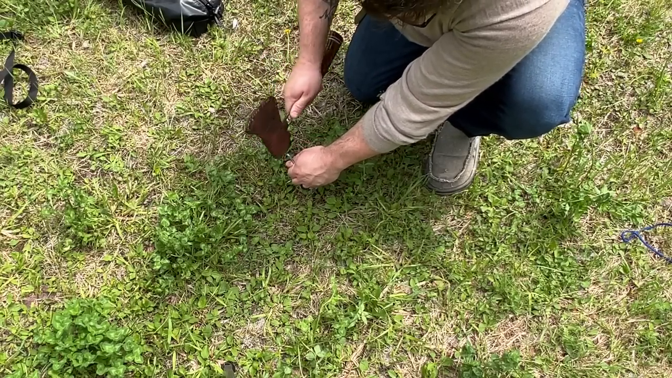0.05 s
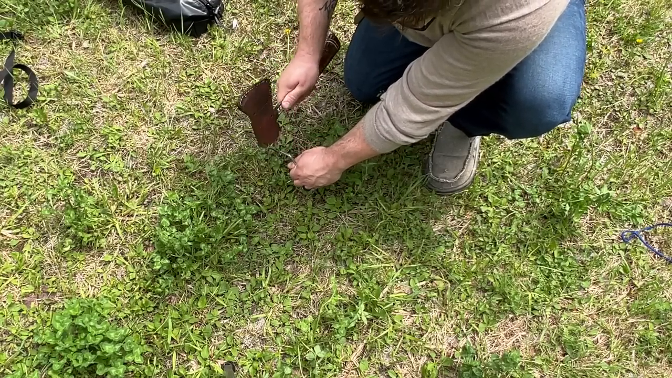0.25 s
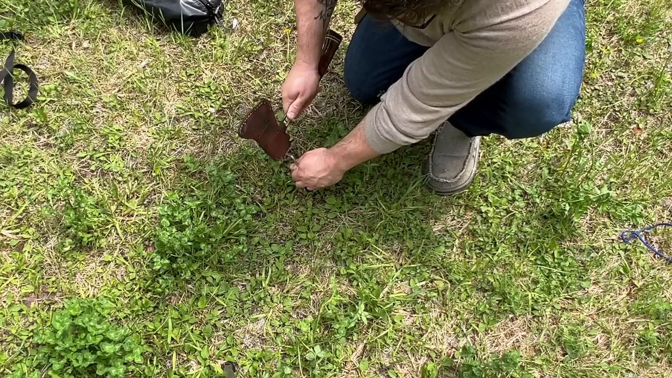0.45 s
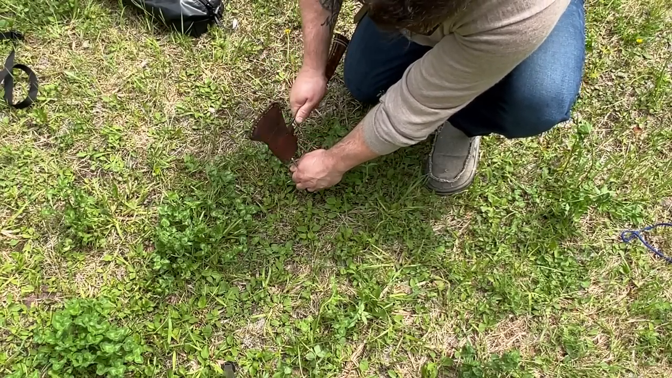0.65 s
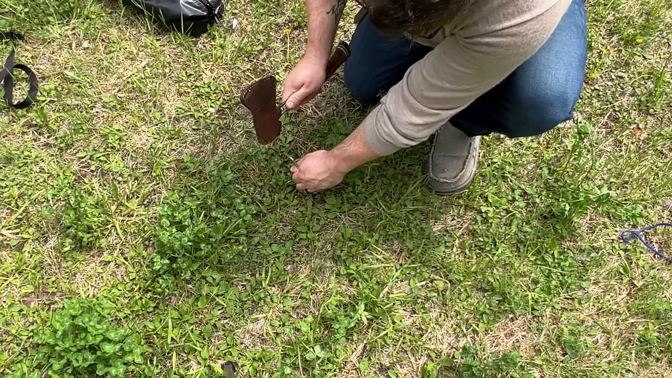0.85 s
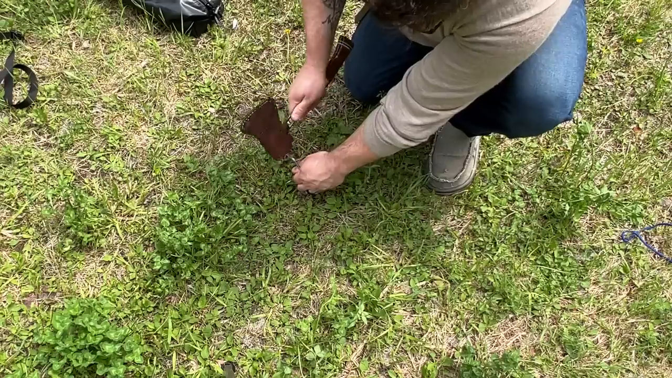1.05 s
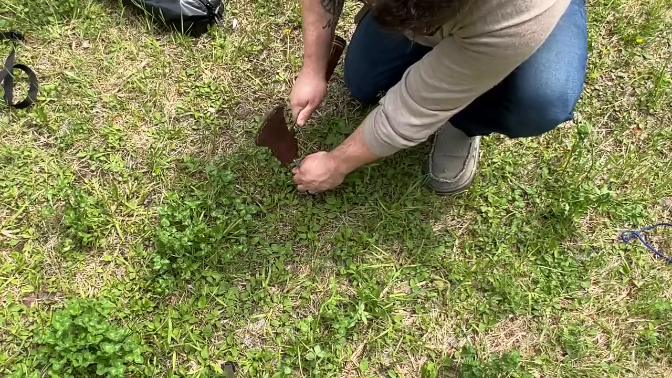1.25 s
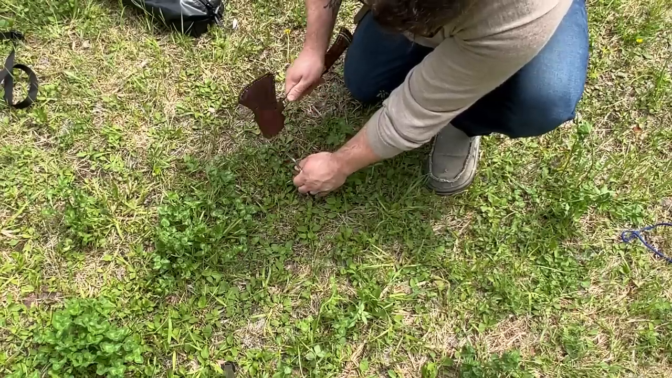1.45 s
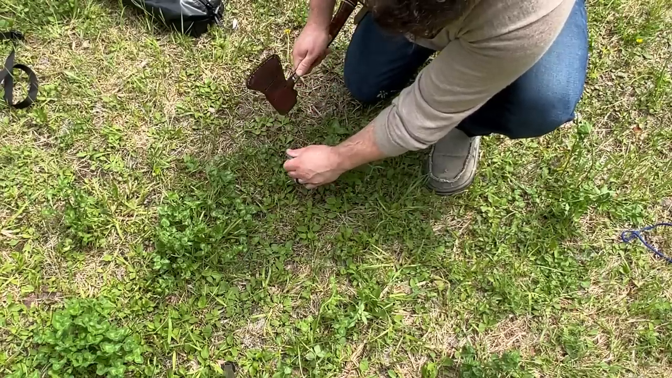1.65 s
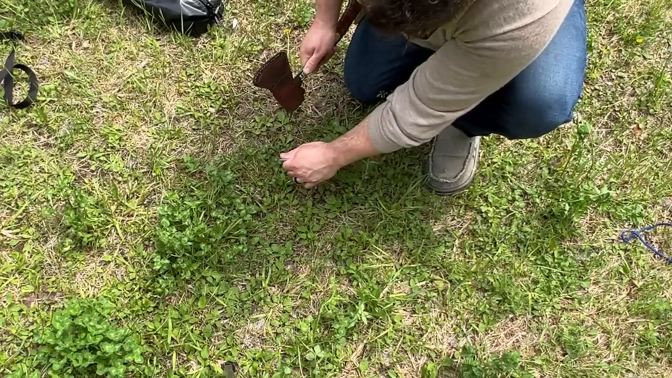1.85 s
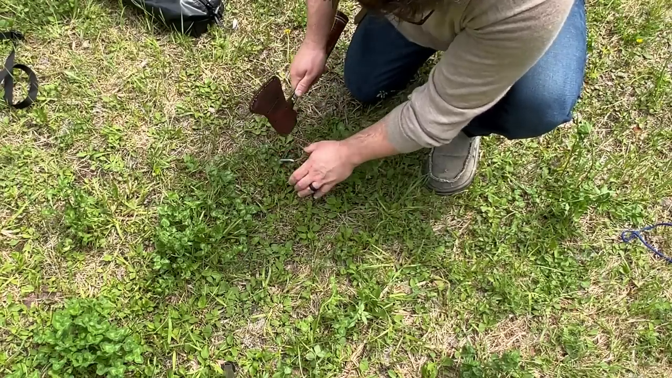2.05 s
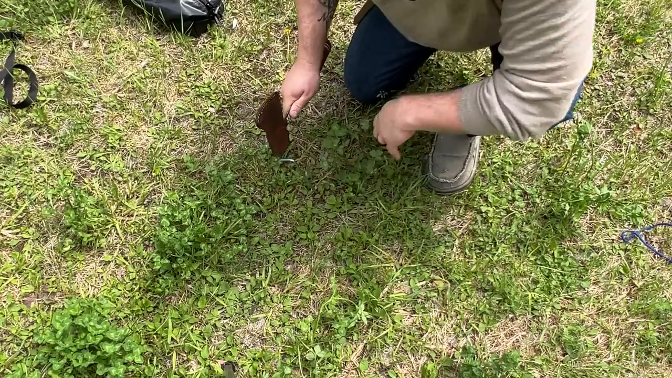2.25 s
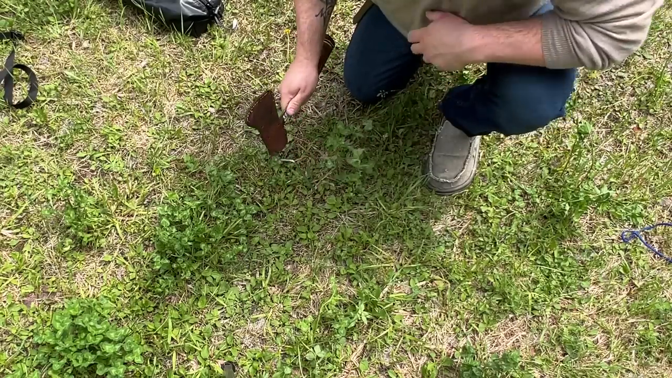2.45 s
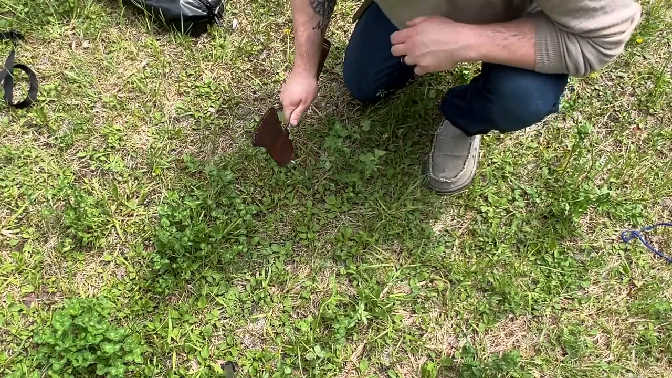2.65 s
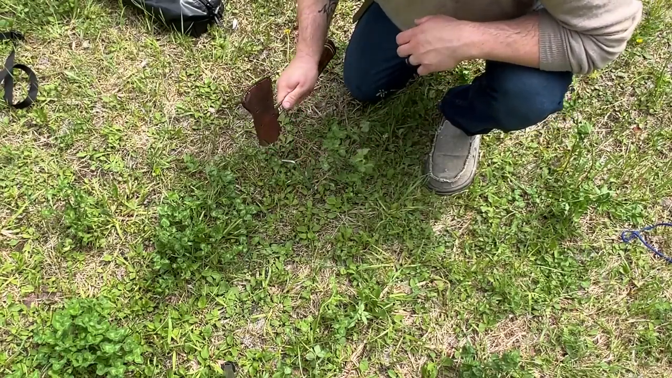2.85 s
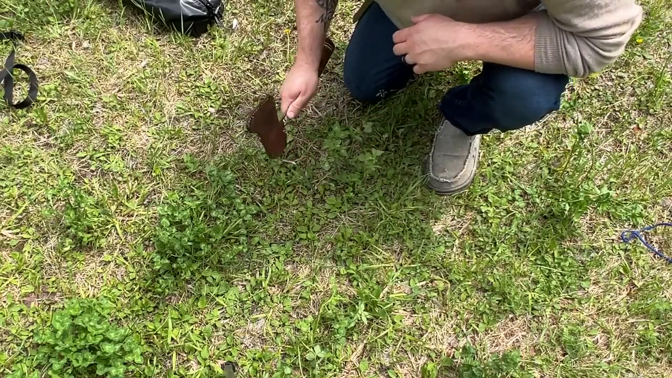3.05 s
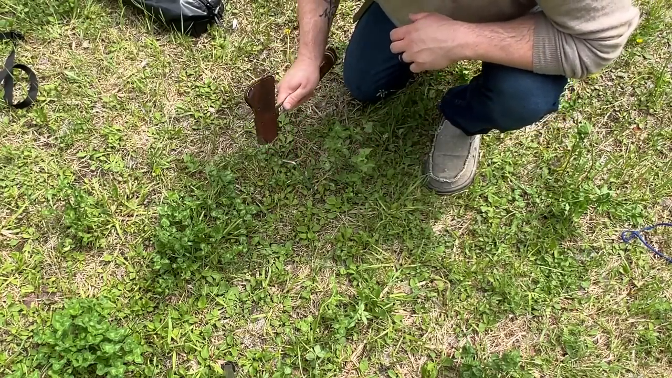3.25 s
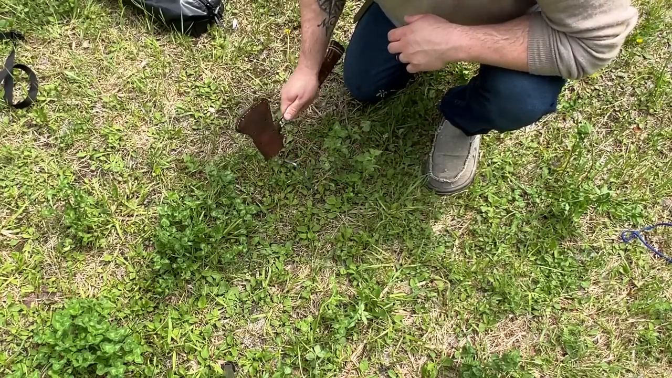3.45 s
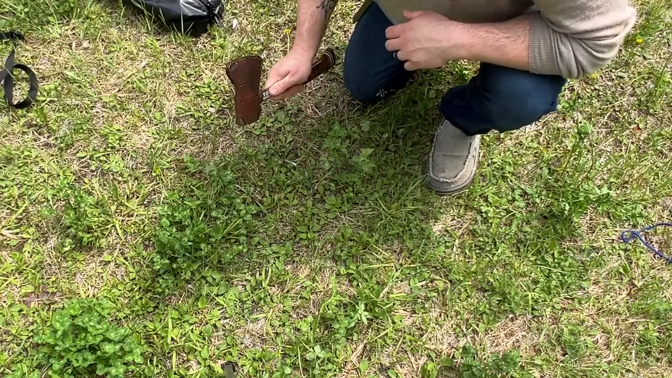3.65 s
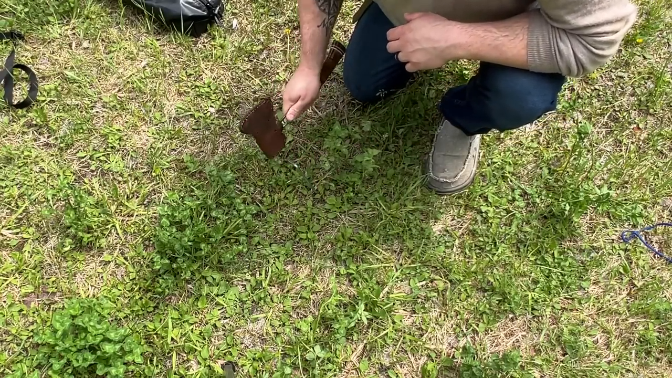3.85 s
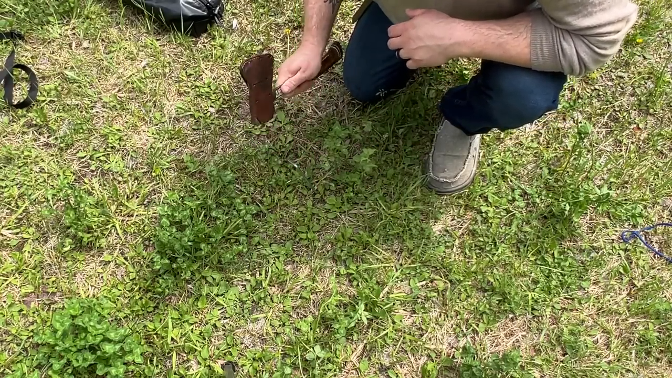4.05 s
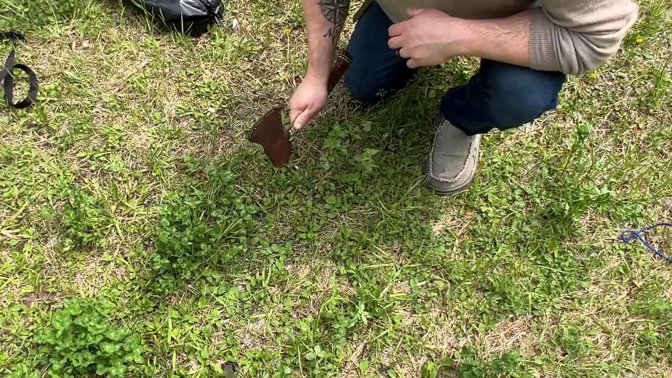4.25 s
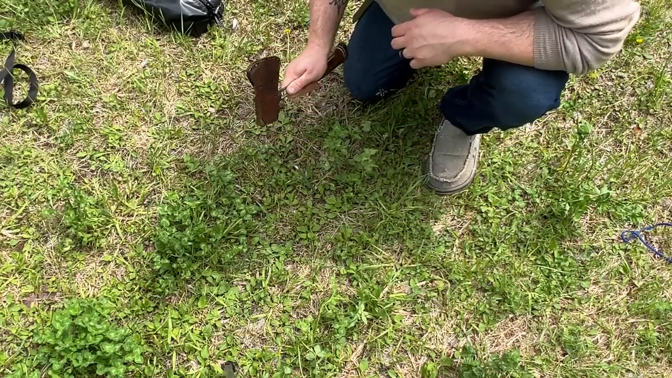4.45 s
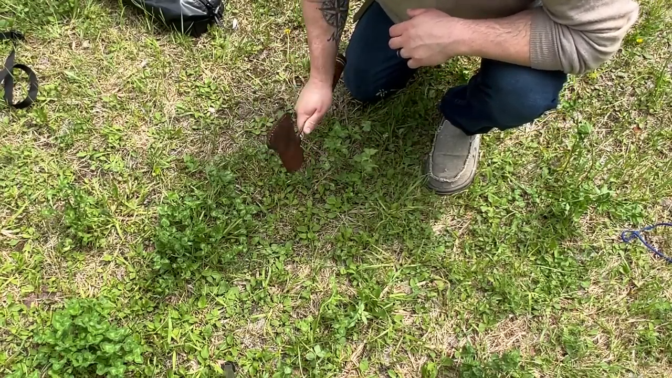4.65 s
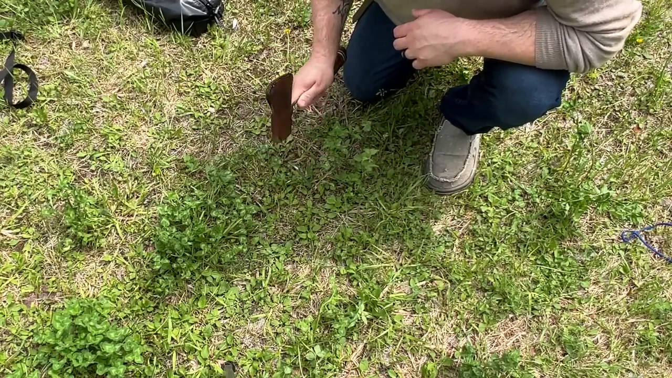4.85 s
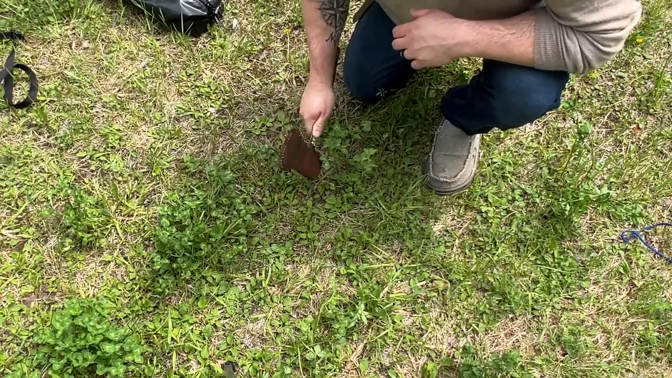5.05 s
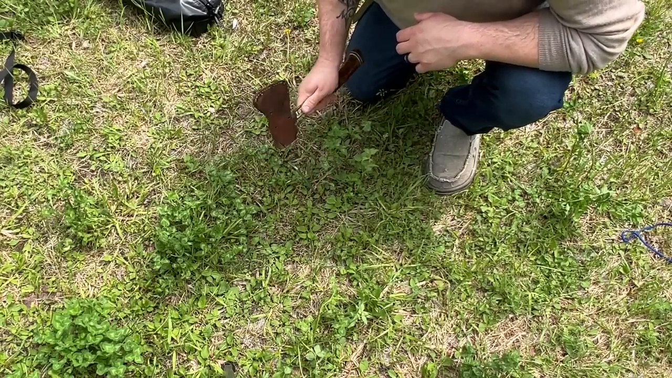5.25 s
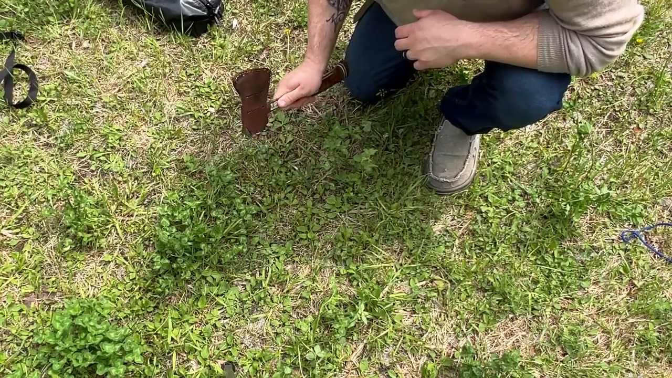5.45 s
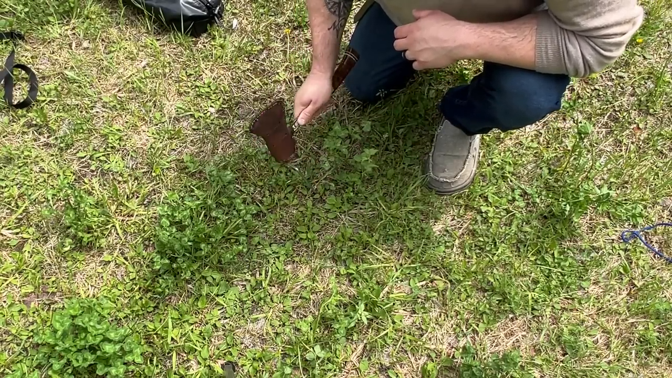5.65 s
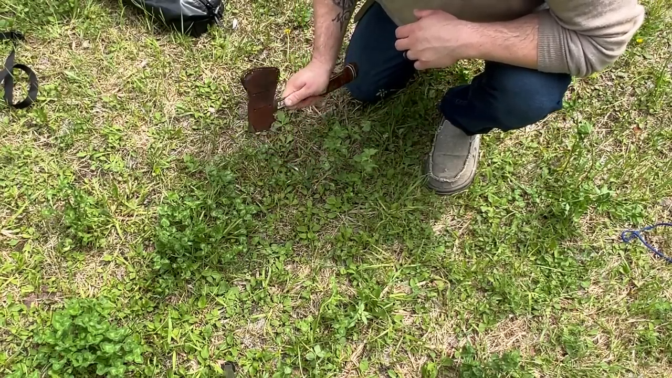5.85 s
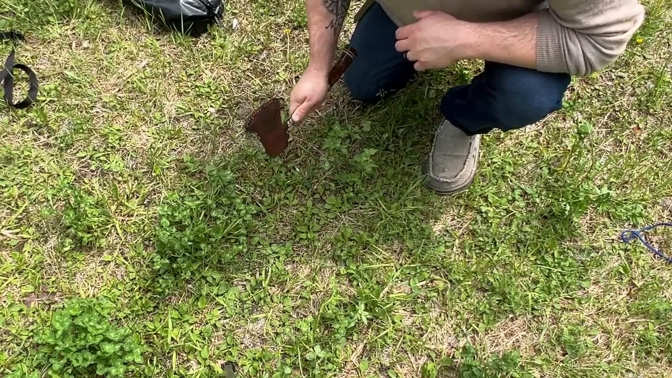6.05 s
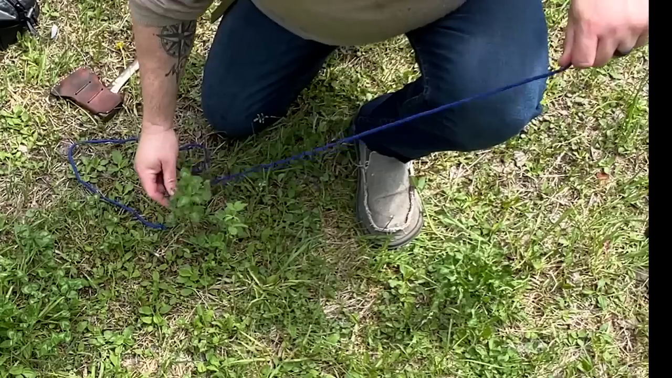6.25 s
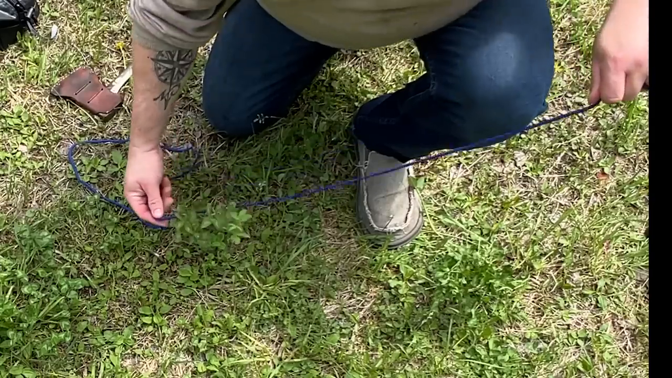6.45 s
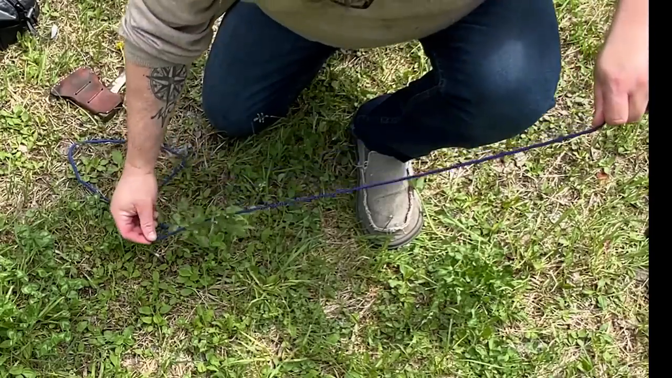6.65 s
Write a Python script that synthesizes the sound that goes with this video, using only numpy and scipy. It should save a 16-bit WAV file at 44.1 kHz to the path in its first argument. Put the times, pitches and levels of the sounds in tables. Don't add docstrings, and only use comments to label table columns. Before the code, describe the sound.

Outdoors, sharp, heavily damped metallic blows with dull earthy thuds, close up, as wind rumbles and a far bird whistles early; quiet breeze ends it.

```python
import sys
import numpy as np
from scipy import signal
from scipy.fft import rfft, irfft, next_fast_len
from scipy.io import wavfile
from scipy.ndimage import uniform_filter1d

SR = 44100
rng = np.random.default_rng(int(sys.argv[2]) if len(sys.argv) > 2 else 0)


def makeup_ratio(level_db):
    decades = np.asarray(level_db, float) / 20
    return 10 ** decades


def dump(signal):
    limited = np.clip(np.atleast_2d(signal).T, -1, 1)
    pcm = np.round(limited * 32767).astype(np.int16)
    wavfile.write(sys.argv[1], SR, pcm)


N = 295470
SPAN = 4096
CUT_S = 6.245


def unit(x):
    return x / np.sqrt(np.mean(x ** 2) + 1e-20)


def at_hz(points, hz):
    points_hz, values = np.transpose(points)
    return np.interp(np.log(np.maximum(hz, 1)), np.log(points_hz), values)


def shaped(x, gain):
    size = next_fast_len(x.shape[-1] + 2048)
    hz = np.arange(size // 2 + 1) * SR / size
    return irfft(rfft(x, size) * gain(hz), size)[..., :x.shape[-1]]


def band(x, low_hz, high_hz):
    return signal.sosfilt(signal.butter(2, [low_hz, high_hz], "band", fs=SR, output="sos"), x)


def drift(rate):
    knots = rng.standard_normal(int(N / SR * 60) + 2)
    position = np.arange(N) / SR * np.clip(rate, .1, 59)
    return unit(np.interp(position, np.arange(len(knots)), knots))


def bells(rows, power):
    t = np.arange(N) / SR
    return sum(makeup_ratio(power * db) * np.exp(-((t - s) / half_s) ** 2) for s, db, half_s in rows)


# f/Hz, level/dB [dB per Hz]
FIELD_COLOUR = [(160, -28), (280, -8), (335, -12), (441, -15), (486, -18), (778, -18), (843, -15.5),
                (915, -19), (1720, -17.5), (2310, -22.5), (3290, -22), (5810, -16.5), (10600, -41.5),
                (12100, -39), (13500, -61.5)]
# f/Hz, level/dB [dB per Hz]
LATE_COLOUR = [(160, -39), (280, 0), (340, -12), (470, -15.5), (778, -22.5), (1060, -17.5), (1990, -20),
               (2460, -17.5), (3190, -29.5), (5900, -24), (10100, -45), (11900, -34), (13500, -57)]
# f/Hz, left-right likeness [-1 to 1]
LIKENESS = [(60, 0.84), (130, 0.84), (290, 0.87), (640, 0.24), (1410, -0.15), (3100, 0.22), (6820, 0.11),
            (15000, 0.14)]


def field():
    mid, side = rng.standard_normal((2, N))

    def width(hz):
        alike = np.clip(at_hz(LIKENESS, hz), -.5, .95)
        return np.sqrt((1 - alike) / (1 + alike))

    def hiss(colour):
        both = shaped(mid, lambda hz: makeup_ratio(at_hz(colour, hz)))
        apart = shaped(side, lambda hz: makeup_ratio(at_hz(colour, hz)) * width(hz))
        midrange_rms = np.sqrt(np.mean(band(both, 700, 8000) ** 2))
        return np.array([both + apart, both - apart]) / midrange_rms

    early = np.arange(N) / SR < CUT_S
    level_db = np.where(early, -70, -72.5) + 0.22 * drift(3.8)
    return np.where(early, hiss(FIELD_COLOUR), hiss(LATE_COLOUR)) * makeup_ratio(level_db)


# f/Hz, width/Hz, level/dB
HUM = [(69, 14, -64), (138, 9.1, -70), (303, 32, -77.5)]


def hum():
    out = np.zeros(N)
    for hz, width_hz, db in HUM:
        order = band(rng.standard_normal(N), hz - width_hz / 2, hz + width_hz / 2)
        out += makeup_ratio(db + 2.5 * drift(1.1)) * unit(order)
    return out


# t/s, rise/s, hold/s, fall/s, level/dB
BIRD = [(.17, .001, 0.04, .001, -59), (.28, 0.048, 0.037, 0.00068, -59.5), (.455, .001, 0.068, 0.035, -56),
        (.84, 0.0012, 0.05, 0.051, -56), (1.91, 0.034, 0.0041, 0.025, -71), (2.01, 0.035, .02, 0.0009, -73),
        (2.15, 0.0263, .02, .001, -63.5)]


def bird():
    from_hz, held_hz, down_hz, sag_hz_per_s = 3120, 3570, 2620, 900
    out, t = np.zeros(N), np.arange(N) / SR
    for s, rise_s, hold_s, fall_s, db in BIRD:
        linger_s = .7 * fall_s
        turns = s + np.cumsum([0, rise_s, hold_s, fall_s, linger_s])
        hz = np.interp(t, turns[:-1], [from_hz, held_hz, held_hz - sag_hz_per_s * hold_s, down_hz])
        swell = np.clip(np.minimum(t - s, turns[-1] - t) / .022, 0, 1)
        out += makeup_ratio(db) * swell * np.sin(2 * np.pi * np.cumsum(hz) / SR)
    blur = rng.standard_normal((2, 3000)) * np.exp(-np.arange(3000) / SR / .022)
    blur[:, 0] = 13
    return signal.fftconvolve(out[None], blur / 28, axes=1)[:, :N]


def buffet(alike, low_hz, high_hz, even):
    shared = rng.standard_normal(N) * np.sqrt(alike)
    pair = shared + rng.standard_normal((2, N)) * np.sqrt(1 - alike)
    x = band(band(pair, low_hz, high_hz), .85 * low_hz, 1.15 * high_hz)
    return x / np.sqrt(uniform_filter1d(np.mean(x ** 2, axis=0), size=even) + 1e-12)


# t/s, peak level/dB, half length/s
GUSTS = [(0.147, -41.5, 0.031), (0.237, -47.5, 0.037), (.4, -43, 0.021), (0.493, -52, 0.039),
         (1.06, -53.5, 0.031), (1.379, -47.5, 0.069), (1.467, -47, 0.017), (1.593, -34.5, 0.029),
         (1.699, -35, 0.057), (1.9, -65, 0.089), (2.223, -56.5, 0.025), (2.502, -52.5, 0.14),
         (2.75, -57.5, 0.067), (2.87, -51, 0.022), (3.154, -60.5, 0.091), (3.9, -58, .08),
         (4.346, -61.5, 0.047), (4.917, -52, 0.026), (5.09, -50, .06), (5.23, -53.5, .025),
         (5.428, -43, 0.018), (5.699, -57.5, 0.034), (6.111, -46.5, 0.026), (6.204, -60, 0.027)]


def wind():
    breeze_db, late_breeze_db = -61, -67.5
    flutter_floor_db, flutter_follows = -69, 0.52
    early = np.arange(N) / SR < CUT_S
    breeze = makeup_ratio(2 * np.where(early, breeze_db, late_breeze_db))
    rumble_db = 10 * np.log10(bells(GUSTS, 2) + breeze)
    flutter_db = flutter_floor_db + flutter_follows * (rumble_db - breeze_db)
    lumps = uniform_filter1d(drift(18), size=900)
    rumble = buffet(.8, 42, 105, even=5000) * makeup_ratio(rumble_db + 2 * lumps)
    flutter = buffet(.75, 100, 230, even=3500) * makeup_ratio(flutter_db + 2.5 * lumps)
    return rumble + flutter


# t/s, level/dB, half length/s
RUSTLE = [
    (1.78, -77, 0.011),
    (2.194, -69, 0.025),
    (6.245, -72, 0.0034),
]


def rustle():
    return bells(RUSTLE, 1) * unit(band(rng.standard_normal((2, N)), 1500, 9700))


# t/s [after the blow], level/dB
SLAP = [
    (0.0194, -23.5),
    (0.02, -35),
    (.0255, -46),
]


def slap(x):
    returns = np.zeros((2, 1500))
    for s, db in SLAP:
        returns[0, round(s * SR)] = makeup_ratio(db)
        returns[1, round((s + .0002) * SR)] = makeup_ratio(db)
    dulled = band(band(x, 170, 8000), 110, 9500)
    return signal.fftconvolve(dulled[None], returns, axes=1)[:, :N]


# t/s [after the blow], level/dB
WASH = [(.004, 8), (.015, 9), (.03, -2), (.07, -4.5), (.1, -10.5), (.25, -25.5), (.6, -54)]
# t/s [after the blow], level/dB
TREBLE_WASH = [(.004, 9), (.012, -4), (.03, -2), (.07, -5), (.1, -13), (.16, -32.5), (.6, -88)]
# f/Hz, level/dB
WASH_COLOUR = [(100, -1.5), (300, -1), (700, 0), (1800, -7.5), (2500, 0), (5000, -3.5), (6000, 0),
               (6650, 8.5), (7400, -5.5), (9200, 1.5), (10400, -26), (12200, 2), (14100, -21.5),
               (15600, 3.5)]


def surroundings(steel, soil, wash_db=-23, split_hz=8000):
    t = np.arange(int(.6 * SR)) / SR

    def decay(rows):
        return makeup_ratio(np.interp(t, *np.transpose(rows), left=-120))

    noise = rng.standard_normal((2, len(t)))
    dull = signal.sosfilt(signal.butter(4, split_hz, fs=SR, output="sos"), noise)
    bright = signal.sosfilt(signal.butter(4, split_hz, "high", fs=SR, output="sos"), noise)
    returns = makeup_ratio(wash_db - 32.5) * (dull * decay(WASH) + bright * decay(TREBLE_WASH))
    wandering_phase = np.cumsum(.22 * rng.standard_normal(N))
    smeared = steel * np.sqrt(2) * np.cos(wandering_phase)
    coloured = shaped(smeared + soil, lambda hz: makeup_ratio(at_hz(WASH_COLOUR, hz)))
    return signal.fftconvolve(coloured[None], returns, axes=1)[:, :N] + slap(steel + soil)


# f/Hz, left lead/radians
PORT_PHASE = [(0, 0), (700, .4), (1550, .35), (2930, 1.2), (6200, 1.5), (7400, 1.9), (8700, -.6),
              (12300, -6.8), (13500, -9), (15200, -12.3), (16700, -12.6)]
# f/Hz, left minus right level/dB
PORT_BALANCE = [(60, .5), (250, 1.4), (1000, .6), (2400, 3.2), (4400, 2.3), (7000, 3.4), (9000, 0),
                (15000, 0)]


def ports(x):
    phase_hz, lead = np.transpose(PORT_PHASE)

    def half(hz):
        return makeup_ratio(at_hz(PORT_BALANCE, hz) / 2) * np.exp(.5j * np.interp(hz, phase_hz, lead))

    return np.array([shaped(x, half), shaped(x, lambda hz: 1 / half(hz))])


def ring(force, hz, t60):
    r, w = makeup_ratio(-60 / (t60 * SR)), 2 * np.pi * hz / SR
    return signal.lfilter([0, np.sin(w)], [1, -2 * r * np.cos(w), r * r], force)


# f/Hz, level/dB, t60/s
HOLE = [(258, -1.5, 0.05), (317, -1, 0.047), (522, -3.5, 0.022), (703, -7.5, 0.017)]
FACES = [1, 1, -1, -1]


def turf(db, delay_s=.0035):
    push = np.zeros(SPAN)
    push[round(delay_s * SR):][:40] = np.hanning(40)
    modes = sum(makeup_ratio(m_db) * ring(push, hz, t60) * sign for (hz, m_db, t60), sign in zip(HOLE, FACES))
    return makeup_ratio(db) * unit(modes)


def ground_wave(db, swell_s, steepness):
    start_hz, end_hz, glide_s, delay_s = 465, 85, .0054, .0022
    t = np.maximum(np.arange(SPAN) / SR - delay_s, 0)
    turns = end_hz * t + (start_hz - end_hz) * glide_s * (1 - np.exp(-t / glide_s))
    swell = (t * np.exp(-t / swell_s)) ** steepness
    return makeup_ratio(db) * unit(np.sin(2 * np.pi * turns) * swell)


def contact(rise_s=.0013, fall_s=.0008):
    t = np.arange(SPAN) / SR
    swell = np.where(t < rise_s, t / rise_s, np.exp(-np.maximum(t - rise_s, 0) / fall_s))
    return rng.standard_normal(SPAN) * swell


def family(force, modes, main_hz, db):
    pitches = [hz or main_hz for hz, m_db, t60 in modes]
    out = np.zeros(SPAN)
    for pitch, (_, m_db, t60) in zip(pitches, modes):
        out += makeup_ratio(m_db + 2.5 * rng.standard_normal()) * ring(force, pitch, t60)
    return makeup_ratio(db) * unit(band(out, .85 * min(pitches), 1.09 * max(pitches)))


# f/Hz [0: placed by the blow], level/dB, t60/s
LOW_BEND = [(0, 0, .018), (2380, -3, .016), (2650, -3, .014)]
UPPER_BEND = [(0, 0, .013), (3400, -6, .01), (4200, -8, .01)]
MID_KNOCK = [(0, 0, .013), (1050, -2, .007)]
STAKE_RING = [(0, 0, .009), (5800, -9, .007), (6600, -3, .008), (7000, -5, .008)]
HEAD_RING = [(0, 0, .008), (11500, -6, .005), (12500, -4, .005)]
EDGE_RING = [(0, 0, .009), (14800, -11, .005)]
# f/Hz, level/dB
CRACK = [(300, -35.5), (1000, -4.5), (2000, -12), (5000, -6.5), (7300, -2.5), (8500, 4), (10000, 9),
         (14000, -8), (16000, -1.5), (17000, -10.5)]


def steel_hit(s, stake_db, stake_hz, low_db, low_hz, crack_db, head_db, upper_db, knock_db):
    rebound_db = -15.5 - 0.39 * crack_db
    first, again = contact(), np.roll(contact(), round(0.003 * SR))
    soft = first + makeup_ratio(rebound_db) * again
    hard = first + makeup_ratio(rebound_db - 6.5) * again
    upper_hz = 3130 + 70 * s
    head_hz = 12800 - 130 * s
    mid_db = -32.5 + 0.33 * knock_db - 1.1 * s
    edge_db = -57 - 0.56 * head_db
    third_db = stake_db - 34.5 - 0.55 * s
    hit = makeup_ratio(crack_db - 22.5) * unit(shaped(hard, lambda hz: makeup_ratio(at_hz(CRACK, hz))))
    hit += family(soft, LOW_BEND, low_hz, low_db - 19)
    hit += family(soft, UPPER_BEND, upper_hz, upper_db - 12)
    hit += family(soft, MID_KNOCK, 1540, mid_db)
    hit += makeup_ratio(third_db) * unit(ring(soft, 4200, .011))
    hit += family(hard, STAKE_RING, stake_hz, stake_db - 23)
    hit += family(hard, HEAD_RING, head_hz, head_db - 14)
    hit += family(hard, EDGE_RING, 15600, edge_db)
    return hit


# t/s, stake ring peak level/dB, ring f/Hz, bend peak level/dB, bend f/Hz
BLOWS = [(0.0854, -11.5, 6970, -19, 2380), (0.3749, -11.5, 6260, -23, 2340), (0.67, -10, 6436, -21.5, 2430),
         (0.9627, -8, 6110, -20.5, 2810), (1.277, -7.5, 6510, -11, 2548), (2.3378, -15.5, 6600, -19, 2410),
         (2.6461, -10, 6350, -14, 2480), (2.9746, -10, 6400, -13, 2620), (3.3449, -13.5, 6620, -24, 2740),
         (3.7874, -4, 6530, -28, 2570), (4.2151, -7.5, 6160, -16, 2460), (4.6313, -8.5, 5960, -17.5, 2250),
         (5.025, -7.5, 6530, -19.5, 2195), (5.5828, -8.5, 6190, -17, 2280), (5.9694, -5, 6330, -23.5, 2416)]
# level/dB of crack peak, head ring, upper bend, soil knock, soil boom
SOIL = [(-17.5, -23.5, -27, -32, -48), (-17.5, -25, -25, -32.5, -40.5), (-19, -29.5, -31, -29.5, -32.5),
        (-16.5, -34, -22, -33, -23.5), (-31, -23.5, -24.5, -23, -30.5), (-39, -27.5, -29.5, -53.5, -33.5),
        (-33, -24.5, -28, -36, -31), (-22, -26, -27, -33, -29), (-23, -28, -26.5, -31, -26),
        (-24, -17.5, -48.5, -27, -26.5), (-23.5, -24.5, -21.5, -28.5, -23.5),
        (-21.5, -26, -21, -23.5, -24.5), (-19, -20, -21, -21.5, -32.5), (-18, -28.5, -25.5, -26, -19.5),
        (-25.5, -16.5, -31, -21.5, -24.5)]


def blows():
    steel, soil = np.zeros(N + SPAN), np.zeros(N + SPAN)
    for blow, (crack_db, head_db, upper_db, knock_db, boom_db) in zip(BLOWS, SOIL):
        s = blow[0]
        at = round((s - .0003) * SR)
        steel[at:at + SPAN] += steel_hit(*blow, crack_db, head_db, upper_db, knock_db)
        soil[at:at + SPAN] += ground_wave(knock_db - 19, 0.0026, 3)
        soil[at:at + SPAN] += ground_wave(boom_db - 14, 0.0093, 1)
        soil[at:at + SPAN] += turf(knock_db - 15 + 0.87 * s)
    return steel[:N], soil[:N]


def scene():
    background = wind() + field() + hum() + bird() + rustle()
    steel, soil = blows()
    before_cut = np.clip((CUT_S - np.arange(N) / SR) / .004, 0, 1)
    return background + ports(steel + soil) + before_cut * surroundings(steel, makeup_ratio(-0.5) * soil)


def roll_off(x):
    return signal.sosfilt(signal.butter(12, 17130, fs=SR, output="sos"), x)


def record(dry):
    x = signal.sosfilt(signal.butter(2, 35, "high", fs=SR, output="sos"), dry)
    x = .95 * np.tanh(x / .95)
    x = signal.sosfilt(signal.cheby2(12, 60, 17300, fs=SR, output="sos"), x)
    return roll_off(x)


dry = scene()
out = record(dry)
dump(out)
```